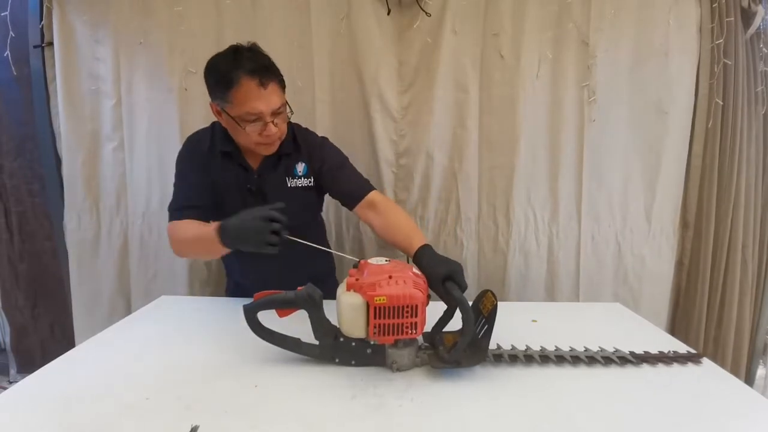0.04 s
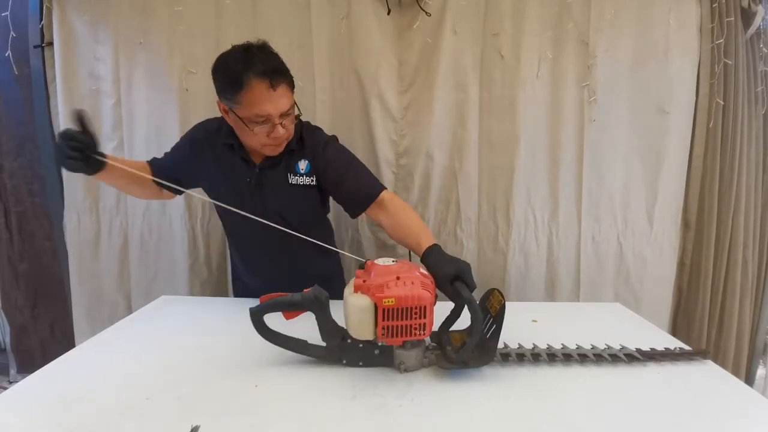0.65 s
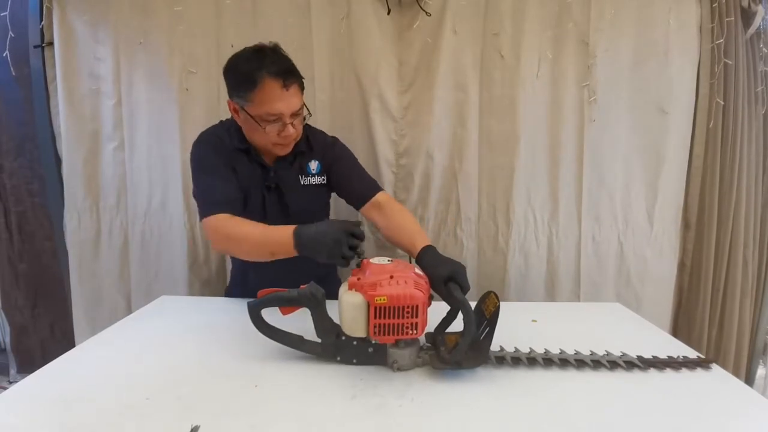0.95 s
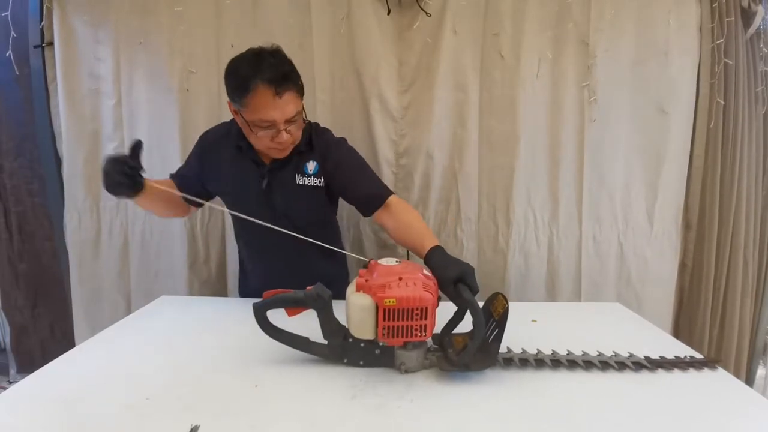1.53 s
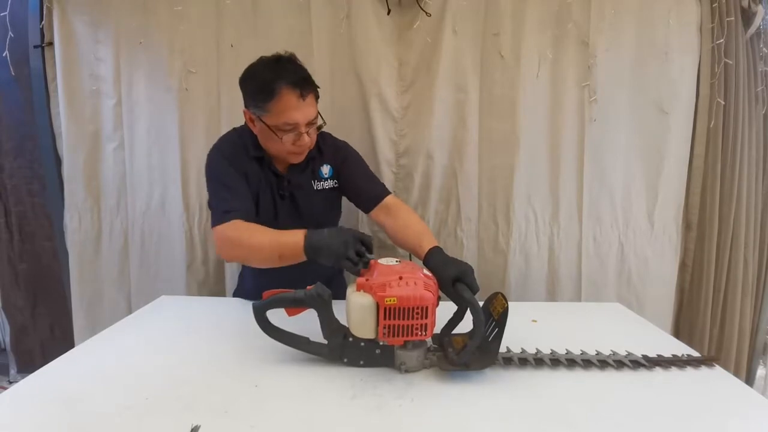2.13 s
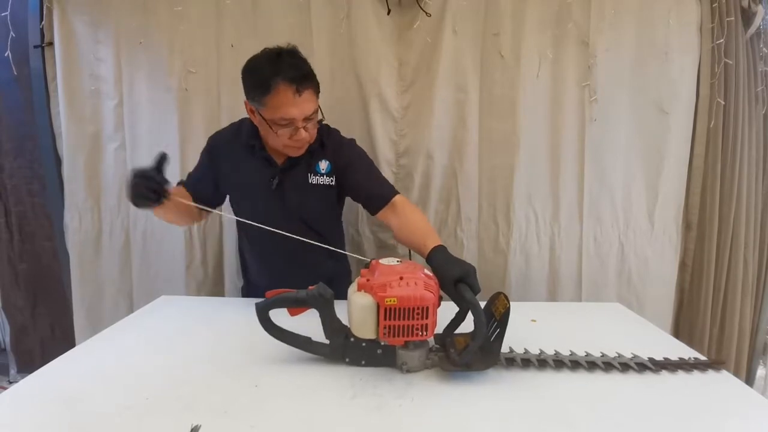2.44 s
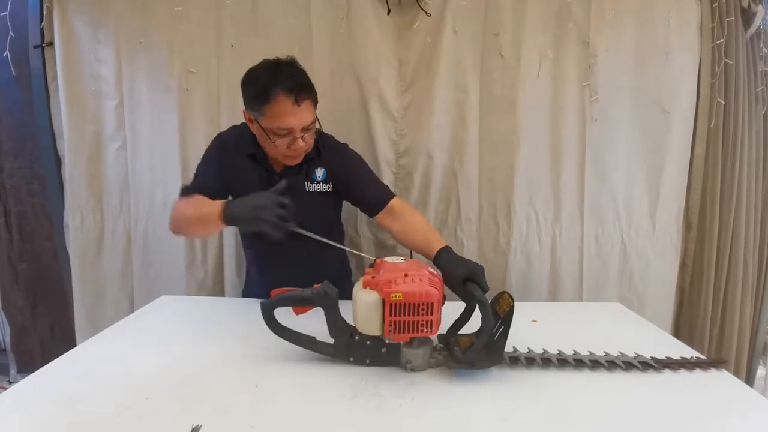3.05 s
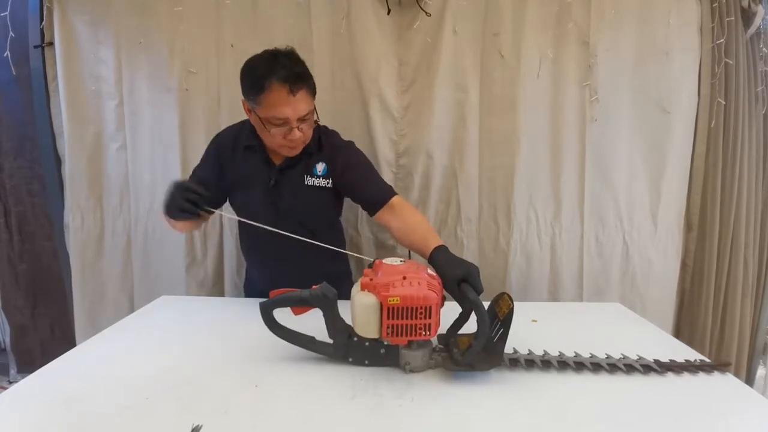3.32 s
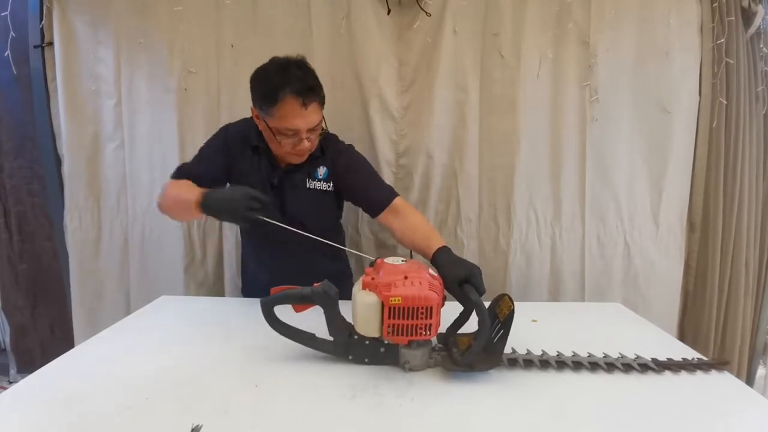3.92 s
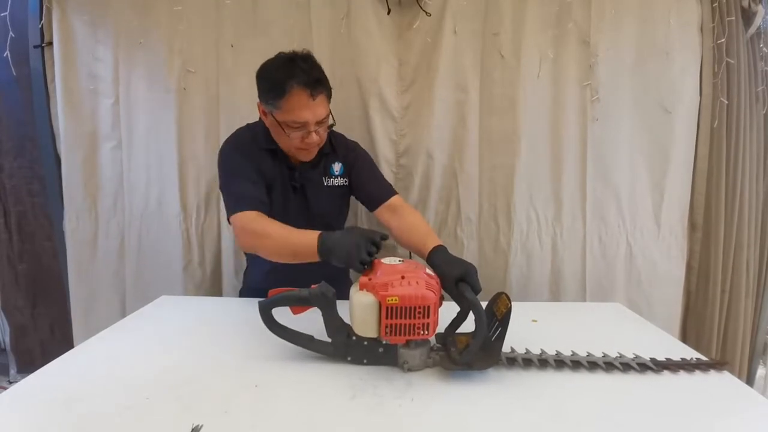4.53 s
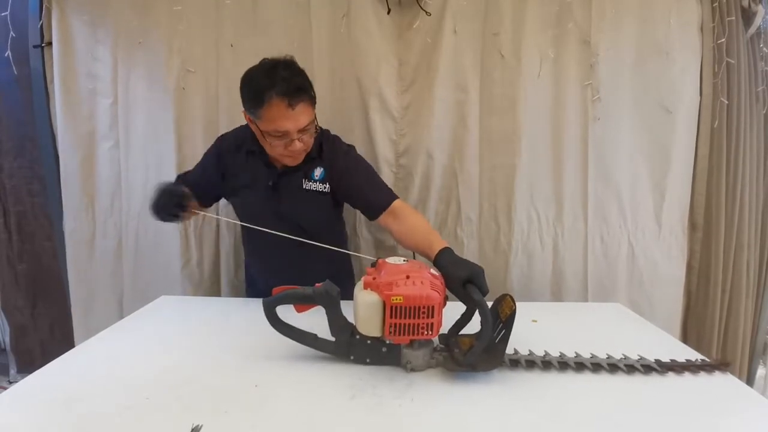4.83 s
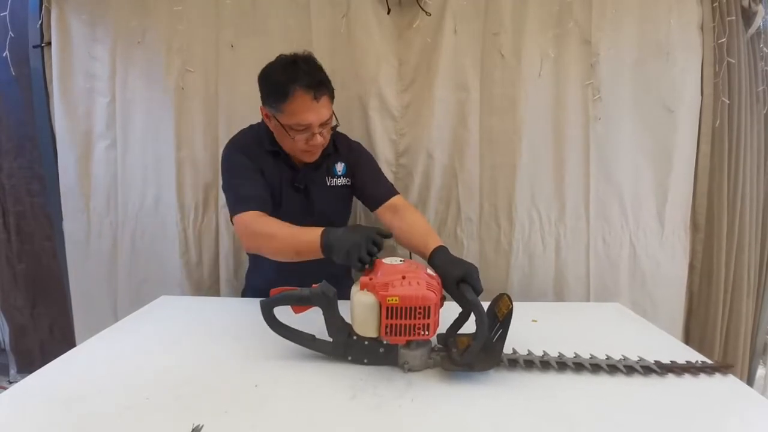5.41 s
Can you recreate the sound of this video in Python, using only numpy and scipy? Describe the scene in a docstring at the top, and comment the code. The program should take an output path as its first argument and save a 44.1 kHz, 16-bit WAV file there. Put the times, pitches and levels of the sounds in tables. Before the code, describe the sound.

Quick repeated starter cord pulls on a hedge trimmer that won't start: clacks, short rattling chugs, spring rewinds and knocks on a table.

```python
"""A two-stroke hedge trimmer on a workshop table is pulled over seven times and never fires.
The starter pawls clack in, then the cylinder puffs once a turn for ten turns, while gears and blades
rattle by friction and the machine knocks on the table. The recoil spring winds the cord back with a
metallic hiss, the pawls tick and the grip lands on the housing. Each impact excites the damped modes
of the part struck; a short reverberation and a faint electrical whine fill the room."""
import sys
import numpy as np
from scipy import signal
from scipy.fft import rfft, irfft
from scipy.io import wavfile
from scipy.ndimage import uniform_filter1d

SR = 44100
rng = np.random.default_rng(int(sys.argv[2]) if len(sys.argv) > 2 else 0)


def master_out(mix):
    """Clip the mix to full scale and print it as 16-bit PCM to the path in sys.argv[1]."""
    frames = np.transpose(np.atleast_2d(mix))
    ceiling = np.clip(frames, -1, 1)
    pcm = np.round(ceiling * 32767).astype(np.int16)
    wavfile.write(sys.argv[1], SR, pcm)


N = 249792

# Levels in the tables are relative: each source applies its own gain.
# the pawls catch, then take the load: start_s, gap_s, catch_db, edge_db, load_db, ring_db
PAWL_CATCHES = [(.623, .022, -6.5, -24.5, -2.5, -25), (1.45, 0.024, -5, -23, 4, -27.5),
                (2.338, .022, -6, -22, -1.5, -25.5), (3.178, .02, -5, -18, -2.5, -23),
                (4.033, .019, -4, -17, 3.5, -18), (4.874, .021, -6, -20, -2.5, -25.5)]
# the spring winds the cord back: start_s, end_s, spring_db, reel_db, cord_db
SPRING_REWINDS = [(0.0, 0.146, -30, -30, -57), (.824, 1.002, -29.5, -35, -44.5),
                  (1.641, 1.776, -28.5, -29, -40), (2.542, 2.687, -28.5, -29.5, -40.5),
                  (3.398, 3.516, -29, -30, -39), (4.255, 4.378, -30, -30, -43),
                  (5.091, 5.194, -30, -28.5, -37)]
# the grip lands on the housing and the hand shifts on it: start_s, body_db, edge_db, rustle_db
GRIP_LANDINGS = [(0.356, -23, -43, -59), (1.141, -21, -43, -56), (1.944, -12, -27, -47.5),
                 (2.855, -17.5, -34, -57), (3.702, -14, -33.5, -60), (4.569, -20, -32.5, -58),
                 (5.45, -15, -31, -63.5)]
# spectra of rattling parts, rubbing cord and rumbling table: frequency_hz, level_db
RATTLE_SPECTRUM = [(210, -24.5), (350, -6.5), (427, -2.5), (525, -8.5), (611, 1), (745, -9.5), (1010, -8.5),
                   (1450, -15), (1670, -18), (2420, -24.5), (3000, -44), (3900, -66), (6600, -120)]
CORD_SPECTRUM = [(1470, -39.5), (2500, -7), (2830, -5.5), (3570, -3.5), (4170, -10), (4650, -9),
                 (6200, -13), (6760, -12), (10000, -20.5), (14100, -24), (16000, -24.5)]
RUMBLE_SPECTRUM = [(25, -22), (45, -24), (64, 0), (95, -10.5), (140, 3.5), (180, -2.5), (240, 0), (320, -2),
                   (480, -14)]
# normal modes of the starter housing and of the spring's coils: pitch_hz, level_db, t60_s
HOUSING_MODES = [(549, -17, 0.26), (666, -24, 0.027), (830, -31, 0.091), (1016, -15.5, 0.066),
                 (1360, -49, .05), (1480, -28.5, 0.056)]
COIL_MODES = [(3500, 0.5, 0.038), (3706, -2, 0.05), (4630, -1, .055), (5600, -5, 0.04), (7067, -1, 0.052),
              (7920, -2, .05), (8400, -7, 0.05), (13900, 6, .025), (14300, -3, .02)]


def from_db(db):
    """Amplitude ratio of a level in decibels."""
    return 10 ** (np.asarray(db) / 20)


def rms_one(x):
    """Normalisation to unit rms."""
    return x / np.sqrt(np.mean(x ** 2) + 1e-20)


def add(track, start_s, sound):
    """Superposition: mix in a sound, provided that it starts within the track."""
    at = int(round(start_s * SR))
    if 0 <= at < N:
        track[at:at + len(sound)] += sound[:N - at]


def cut(x, hz, kind):
    """Fourth-order low- or high-pass filter."""
    return signal.sosfilt(signal.butter(4, hz, kind, fs=SR, output="sos"), x + 1e-18)


def gate(start, end, rise_s, fade_s):
    """Envelope with a linear rise from start, a hold until end and an exponential decay."""
    t = np.arange(N) / SR
    return np.clip((t - start) / rise_s, 0, 1) * np.exp(-np.clip((t - end) / fade_s, 0, 20))


def colour(x, spectrum):
    """Minimum-phase filter with the given spectrum; white noise keeps its power."""
    size = 2 ** 14
    hz, db = np.transpose(spectrum)
    log_hz = np.log(np.maximum(np.arange(size // 2 + 1) * SR / size, 1))
    beyond = np.maximum(np.log(hz[0]) - log_hz, 0) + np.maximum(log_hz - np.log(hz[-1]), 0)
    gain = rms_one(from_db(np.interp(log_hz, np.log(hz), db) - 24 * np.minimum(beyond, 2)))
    cepstrum = irfft(np.log(gain))
    cepstrum[1:size // 2] *= 2  # folding the cepstrum makes the filter causal
    cepstrum[size // 2 + 1:] = 0
    return signal.fftconvolve(x, irfft(np.exp(rfft(cepstrum))))[:N]


def ring(force, modes):
    """Modal response: a force drives each mode of a body as a damped oscillator."""
    out = np.zeros(N)
    for hz, db, t60 in modes:
        decay, step = np.exp(-np.log(1000) / (t60 * SR)), 2 * np.pi * hz / SR
        feedback = [1, -2 * decay * np.cos(step), decay * decay]
        out += from_db(db) * signal.lfilter([0, np.sin(step)], feedback, force + 1e-18)
    return out


def flutter(per_s):
    """Random modulation: smoothed noise with about per_s new values a second and a spread near 1."""
    span = int(SR / per_s)
    wobble = uniform_filter1d(uniform_filter1d(rng.standard_normal(N), span), span)
    return np.clip(rms_one(wobble), -2.5, 2.5)


def grains(per_s, spread_db, smooth):
    """Shot noise: tiny contacts of uneven size over a bed of smooth friction; rms 1."""
    sizes = from_db(spread_db * np.minimum(rng.exponential(1, N), 4)) * rng.choice([-1, 1], N)
    contacts = rms_one(sizes * (rng.random(N) < per_s / SR))
    return rms_one(contacts + smooth * rng.standard_normal(N))


def scuffs(per_s, shared_db, own_db):
    """Rough sliding friction: half-octave noise bands fluctuate, singly and together; rms 1."""
    edges_hz = np.geomspace(300, 17000, 13)
    white, out = rng.standard_normal((2, N)), np.zeros(N)
    for k, band in enumerate(zip(edges_hz, edges_hz[1:])):
        noise = signal.sosfilt(signal.butter(2, band, "band", fs=SR, output="sos"), white[k % 2])
        out += noise * from_db(own_db * flutter(per_s))
    return rms_one(out * from_db(shared_db * flutter(per_s)))


def impacts(events, spectrum, modes, body_db, body_t60, edge_db, edge_t60, ring_db, rise_s, edge_rise_s):
    """Impact noise: loose parts chatter with a dull body and a bright edge; the struck part rings."""
    body, edge, clicks = np.zeros((3, N))
    t = np.arange(SR // 4) / SR
    onset = 1 - np.exp(-t / rise_s)
    # the bright edge of each hit swells in over a few milliseconds
    swell = from_db(-30 * np.maximum(1 - t / edge_rise_s, 0))
    for start, low_db, high_db in events:
        chatter = rng.choice([-1, 1], len(t))
        add(body, start, from_db(low_db + body_db - 60 * t / body_t60) * chatter * onset)
        add(edge, start - edge_rise_s / 2, from_db(high_db + edge_db - 60 * t / edge_t60) * chatter * swell)
        add(clicks, start + rise_s, from_db([low_db + ring_db]))
    edge_share = np.std(cut(colour(rng.standard_normal(N), spectrum), 2620, "high"))
    contact = cut(body, 2500, "low") + cut(edge, 2920, "high") / edge_share
    return colour(contact, spectrum) + ring(clicks, modes)


def bouncing(events, bounce_s, bounce_db):
    """Inelastic rebound: one weaker impact follows each blow. Rows: start_s, body_db, edge_db."""
    return [(start + delay, body_db + loss_db, edge_db + loss_db)
            for start, body_db, edge_db, *_ in events
            for delay, loss_db in ((0, 0), (bounce_s, bounce_db))]


def background():
    """Noise floor: broadband room air under the pure tones of a faint electrical whine."""
    # still air: frequency_hz, level_db
    air_spectrum = [(15, -33), (25, 6), (416, -6.5), (545, -1), (1370, -19), (1560, -14.5), (2610, -18),
                    (3160, -16), (3430, -19.5), (3920, -10), (4370, -18), (7920, -14.5), (16000, -23.5)]
    # partials of the whine: pitch_hz, level_db
    partials = [(2401, -79.5), (3198, -88.5), (3801, -71), (6401, -85.5), (8000, -81.5)]
    t = np.arange(N) / SR
    whine = sum(np.sqrt(2) * from_db(db) * np.sin(2 * np.pi * hz * t) for hz, db in partials)
    return from_db(-62.5) * colour(rng.standard_normal(N), air_spectrum) + whine


def workshop(x, wet_db, low_t60, high_t60, high_db):
    """Reverberation: the diffuse field of a curtained room decays exponentially, treble first."""
    t = np.arange(SR) / SR
    noise = rng.standard_normal(SR) * np.clip((t - .006) / 0.0093, 0, 1)
    low_decay = np.exp(-np.log(1000) * t / low_t60)
    low = cut(noise, 1500, "low") * low_decay
    high = cut(noise, 1500, "high") * np.exp(-np.log(1000) * t / high_t60)
    tail = (low + from_db(high_db) * high) / np.sqrt(np.sum(low_decay ** 2))
    return x + from_db(wet_db) * signal.fftconvolve(x, tail)[:N]


def resonate(x):
    """Structural resonance: table top and housing lift or dip narrow bands of the machine's sound."""
    # peaks and dips of the structure: centre_hz, width_hz, gain_db
    resonances = [(68.4, 12.25, -1), (93, 38, -7.5), (133.7, 21, 4.5), (169.5, 12, -4.5), (557, 24, 3),
                  (834, 14, 3.5), (1060, 47, 1.5), (1186, 120, 3), (1500, 47, 2.5), (1870, 130, 0.5),
                  (2295, 160, 3), (2410, 100, 2.5), (3330, 60, -2), (4560, 140, 4.5)]
    for hz, width, db in resonances:
        x = x + (from_db(db) - 1) * signal.lfilter(*signal.iirpeak(hz, hz / width, fs=SR), x)
    return x


def reel_cord_and_hand():
    """Sliding friction: the reel turns, the cord rubs its eyelet, the machine shifts under the hand."""
    t = np.arange(N) / SR
    reel, cord, bumps = np.zeros((3, N))
    reel_db_per_s, rustle_db_per_s, slack_s = -67, -53.5, 0.044
    for (start, end, _, reel_db, cord_db), (landing, *_, rustle_db) in zip(SPRING_REWINDS, GRIP_LANDINGS):
        running = gate(start, landing - 0.026, rise_s=.1, fade_s=0.013)
        running *= from_db(reel_db_per_s * np.maximum(t - end, 0))  # the reel runs out after the spring
        rustle = from_db(rustle_db + rustle_db_per_s * np.abs(t - landing))
        rustle *= np.clip((t - landing) / .02, 0, 1)
        reel += from_db(reel_db) * running + rustle
        cord += from_db(cord_db) * running + from_db(-9) * rustle
        bumps += from_db(6) * rustle
    for catch, *_ in PAWL_CATCHES:
        slack = gate(catch - slack_s, catch, rise_s=slack_s, fade_s=0.028)  # the hand takes up the slack
        jolt = gate(catch - .006, catch + .06, rise_s=.012, fade_s=0.043)
        reel += from_db(-44) * slack
        cord += from_db(-56.5) * slack
        bumps += from_db(-41.5) * slack + from_db(-21) * jolt
    sliding = from_db(-1.0) * reel * colour(scuffs(per_s=200, shared_db=8.5, own_db=4.5), RATTLE_SPECTRUM)
    rubbing = from_db(-3) * cord * colour(grains(per_s=610, spread_db=9.0, smooth=1.0), CORD_SPECTRUM)
    shifting = from_db(-4.5) * bumps * colour(rng.standard_normal(N), RUMBLE_SPECTRUM)
    return sliding + rubbing + shifting


def recoil_spring():
    """Friction-driven modes: the steel coils scrape on each other, each mode ringing in its own fits."""
    # scraping steel: frequency_hz, level_db
    scrape_spectrum = [(2000, -12.5), (2900, -6.5), (3500, 5), (4620, -6), (5300, -10.5), (6300, -15),
                       (7500, -12), (10000, -15), (13000, -11.5), (13900, -0.5), (14800, -9.5)]
    t, level = np.arange(N) / SR, np.zeros(N)
    for start, end, db, *_ in SPRING_REWINDS:
        wound = np.clip((t - start) / (end - start), 0, 1)
        droop_db = -1.5 * wound ** 2  # the reel slows
        level += from_db(db + droop_db) * gate(start, end, rise_s=0.013, fade_s=0.013)
    scrape = level * colour(scuffs(per_s=280, shared_db=5.0, own_db=6.0), scrape_spectrum)
    singing = sum(ring(rng.standard_normal(N), [mode]) * from_db(5 * flutter(160)) for mode in COIL_MODES)
    return from_db(-1) * scrape + from_db(-3.5) * level * rms_one(singing)


def grip_landings():
    """Impact and rebound: the plastic grip strikes the housing and rings on its seat."""
    # contact noise: frequency_hz, level_db
    spectrum = [(88, -47), (150, -3), (260, -17.5), (583, -1.5), (713, -3.5), (1050, -13), (1570, -21.5),
                (1950, -15.5), (2620, -29.5), (3850, -31), (5980, -43), (7050, -48), (12000, -57),
                (15600, -86), (22000, -120)]
    # modes of the seated grip: pitch_hz, level_db, t60_s
    grip_modes = [(567, -6.5, 0.17), (1028, -11.5, 0.022), (1764, -13.5, 0.024), (2170, -15, 0.029),
                  (3130, -25, 0.024), (6500, -27, 0.035)]
    events = bouncing(GRIP_LANDINGS, bounce_s=.008, bounce_db=-8.5)
    return impacts(events, spectrum, grip_modes, body_db=-6.5, body_t60=0.07, edge_db=8.5,
                   edge_t60=0.025, ring_db=-2.5, rise_s=0.00091, edge_rise_s=.004)


def pawl_slips(swell_db, scatter_db):
    """Ratchet action: the pawls fold back, then slip over the flywheel in even, swelling runs."""
    # folds as the crank slows: start_s, body_db, edge_db
    folds = [(.103, -7, -34), (.963, -9, -43), (2.654, -3.5, -18), (3.482, -10, -19.5), (4.342, -10, -20)]
    # runs of ticks: first_s, last_s, count, body_db, edge_db
    runs = [(0.236, 0.307, 4, -19.5, -28), (1.123, 1.168, 2, -27, -30.5), (1.864, 1.915, 3, -17.5, -25.5),
            (2.746, 2.833, 3, -22, -27), (3.583, 3.661, 4, -18.5, -28.5), (4.45, 4.536, 5, -17, -30.5),
            (5.281, 5.405, 6, -19.5, -29.5)]
    slips = list(folds)
    for first, last, count, body_db, edge_db in runs:
        for along in np.linspace(0, 1, count):
            body_lift, edge_lift = swell_db * (along - .5) + scatter_db * rng.standard_normal(2)
            slips.append((first + along * (last - first), body_db + body_lift, edge_db + edge_lift))
    return slips


def coil_ring(slips):
    """Free vibration: each slip of a pawl sets the spring's modes ringing in a new mix."""
    clicks = np.zeros(N)
    for start, _, edge_db in slips:
        add(clicks, start + 0.0019, from_db([edge_db - 16]))
    clicks = cut(clicks, 12000, "low")
    return sum(ring(clicks * from_db(4.5 * flutter(49)), [mode]) for mode in COIL_MODES)


def pawl_ticks(slips):
    """Light impacts: each slip of a pawl ticks and excites the modes of the housing."""
    # contact noise: frequency_hz, level_db
    spectrum = [(210, -46.5), (350, -29.5), (490, -10.5), (575, 6.5), (730, -4), (1060, -12), (1630, -22),
                (2710, -21.5), (3450, -13.5), (4310, -20), (4670, -19), (5220, -20.5), (8170, -26.5),
                (9750, -32.5), (16000, -33)]
    return impacts(slips, spectrum, HOUSING_MODES, body_db=-9, body_t60=0.046, edge_db=6.5,
                   edge_t60=0.03, ring_db=-6.0, rise_s=0.0006, edge_rise_s=0.0055)


def pawl_clacks():
    """Double impact: the pawls catch, then take the load; the hollow cover and their own steel ring."""
    # contact noise: frequency_hz, level_db
    spectrum = [(88, -38), (150, -8), (422, -5.5), (589, 6.5), (790, -4.5), (1500, -5), (1790, -21),
                (2400, -11), (2700, -29.5), (3770, -23), (6260, -32.5), (6770, -31), (10600, -38),
                (13700, -30.5), (16000, -42)]
    # modes of the starter cover and of the pawls: pitch_hz, level_db, t60_s
    cover_modes = [(555.6, -15.5, 0.074), (614, -14, 0.018), (1270, -13.5, 0.013)]
    pawl_modes = [(1390, -6, .08), (1610, -1, .05), (2568, -13, .09), (3005, -9, .14), (4797, -8, .09),
                  (6760, -16, .07), (8250, -8, .08), (13950, -3, .06), (14150, -8, .09)]
    events, loading = [], np.zeros(N)
    for start, gap, catch_db, edge_db, load_db, ring_db in PAWL_CATCHES:
        events += [(start, catch_db, edge_db), (start + gap, load_db, -16.5)]
        add(loading, start + gap + .003, from_db([ring_db - 1]))
    clacks = impacts(events, spectrum, cover_modes, body_db=-1.5, body_t60=0.038, edge_db=8.5,
                     edge_t60=0.036, ring_db=1.5, rise_s=0.0012, edge_rise_s=0.002925)
    return clacks + ring(loading, pawl_modes)


def table_knocks():
    """Impact and rebound: the machine knocks on the table and its housing rings."""
    # blows on the table: start_s, body_db, edge_db
    knocks = [(.033, 2, -21.5), (.709, 4, -20.5), (.861, 6.5, -15.5), (1.536, -8.5, -31),
              (1.678, -3.5, -21.5), (2.424, -3, -30.5), (2.573, -6.5, -28), (3.259, -9, -32.5),
              (3.41, -2, -31), (4.273, 2.5, -19.5), (4.958, -1.5, -29.5), (5.119, 4, -18.5)]
    # contact noise: frequency_hz, level_db
    spectrum = [(59, -32), (100, -0.5), (249, 2.5), (784, 3.5), (1360, -5), (1520, -3), (2800, -19),
                (4670, -24.5), (6420, -33), (7140, -29), (12100, -34.5), (13800, -33), (16000, -34)]
    events = bouncing(knocks, bounce_s=.01, bounce_db=-11.5)
    return impacts(events, spectrum, HOUSING_MODES, body_db=-6.0, body_t60=0.1, edge_db=0.5,
                   edge_t60=0.13, ring_db=-10.5, rise_s=0.00038, edge_rise_s=.003)


def crank_turns(turns=10, fastest_turn=2.89, run_up_turns=4.47):
    """Inertia: the crank speeds up, then coasts. Yields each pull's compression times and turns per s."""
    # pulls of the cord: first_compression_s, top_speed_turns_per_s, coast_turns
    pulls = [(-.1425, 40.8, 5.6), (.6879, 43.7, 6.27), (1.5229, 43.54, 6.06), (2.4069, 40.94, 5.8),
             (3.2449, 42.29, 6.12), (4.1014, 41.24, 5.91), (4.9446, 43.22, 6.05)]
    past_top = np.arange(turns) + .5 - fastest_turn
    for start, top_speed, coast_turns in pulls:
        spread_turns = np.where(past_top < 0, run_up_turns, coast_turns)
        speed = top_speed * np.exp(-(past_top / spread_turns) ** 2)
        times = start + np.r_[0, np.cumsum(1 / speed)]
        yield times, 1 / np.gradient(times)


def rocking(full_speed_hz, table_hz, width_s):
    """Forced vibration: each compression rocks the machine in a soft swell of the table's low note."""
    note, swell = np.zeros((2, N))
    lead = SR // 16
    t = np.arange(-lead, lead) / SR
    for when, speed in np.hstack(list(crank_turns())).T:
        shape = (speed / full_speed_hz) ** 0.91 * np.exp(-(t / width_s) ** 2 / 2)
        add(note, when - lead / SR, shape * np.sin(2 * np.pi * (table_hz * t + rng.random())))
        add(swell, when - lead / SR, shape)
    return from_db(-29.5) * (note + swell * colour(rng.standard_normal(N), RUMBLE_SPECTRUM))


def drive_train(full_speed_hz, run_up_s, jerk_s, jerk_share, run_down_s):
    """Friction noise grows with speed: gears and blades jerk into a rattle and the table rumbles."""
    t, effort = np.arange(N) / SR, np.zeros(N)
    for times, speed in crank_turns():
        turn = np.interp(t, times, np.arange(len(times)))
        start = times[0] - run_up_s
        knots_s = np.r_[start - jerk_s, start, times, times[-1] + run_down_s]
        pace = np.interp(t, knots_s, np.r_[0, jerk_share * speed[0], speed, 0]) / full_speed_hz
        effort += pace * from_db(-0.2 * np.cos(2 * np.pi * (turn - 0.24)))  # a slight surge once a turn
    friction = scuffs(per_s=260, shared_db=2.3, own_db=3.5)
    contacts = grains(per_s=520, spread_db=-1.0, smooth=0.74)
    gears = from_db(-25.5) * effort ** 1.37 * colour(friction, RATTLE_SPECTRUM)
    rubbing = from_db(-40.5) * effort ** 0.98 * colour(friction, CORD_SPECTRUM)
    rumble = from_db(-19.0) * effort ** 2.12 * colour(contacts, RUMBLE_SPECTRUM)
    return gears + rubbing + rumble


def cylinder(puff_db, width_s, full_speed_hz):
    """Pressure pulses: once a turn the port sucks and pushes air, softer and longer as the crank slows."""
    # modes of the table top: pitch_hz, level_db, t60_s
    table_modes = [(62, -49, 0.088), (141, -28, 0.26)]
    # reflections from near surfaces: delay_s, level_db
    echoes = [(.0072, -13.5), (0.0139, -32)]
    puffs, kicks = np.zeros((2, N))
    lead = SR // 100
    t = np.arange(-lead, lead) / SR
    for when, speed in np.hstack(list(crank_turns())).T:
        effort = min(speed / full_speed_hz, 1)
        pulse_time = t / (width_s / effort ** 0.66)
        pulse = pulse_time * np.exp(-pulse_time ** 2 / 2)
        add(puffs, when - lead / SR, from_db(puff_db) * effort ** 2.54 * pulse)
        add(kicks, when - .0015, np.array([effort ** 1.2]))  # each compression also kicks the table
    out = puffs + ring(kicks, table_modes)
    for delay, db in echoes:
        add(out, delay, from_db(db) * puffs)
    return out


def scene():
    """Superposition: the machine's sounds pass through its resonances and the room, over the background."""
    machine = cylinder(puff_db=-1.0, width_s=0.00067, full_speed_hz=28.1)
    machine += rocking(full_speed_hz=36, table_hz=141, width_s=.012)
    machine += drive_train(full_speed_hz=38.3, run_up_s=0.08, jerk_s=0.006, jerk_share=0.58,
                           run_down_s=0.032)
    machine += reel_cord_and_hand()
    slips = pawl_slips(swell_db=2.5, scatter_db=2.5)
    machine += recoil_spring() + coil_ring(slips)
    machine += pawl_clacks() + table_knocks() + pawl_ticks(slips) + grip_landings()
    in_room = workshop(resonate(machine), wet_db=-12.0, low_t60=0.21, high_t60=0.16, high_db=4.0)
    return (in_room + background())[None]


def record(dry):
    """Soft saturation rounds the loudest blows; a steep low-pass removes the highest treble."""
    ceiling, cutoff_hz = .92, 15900
    rounded = dry / (1 + (dry / ceiling) ** 4) ** (1 / 4)
    return signal.sosfilt(signal.ellip(12, .1, 80, cutoff_hz, fs=SR, output="sos"), rounded)


dry = scene()
out = record(dry)
master_out(out)
```